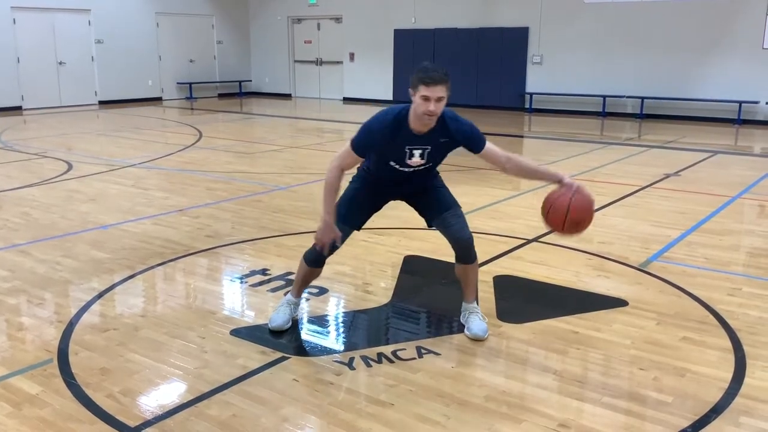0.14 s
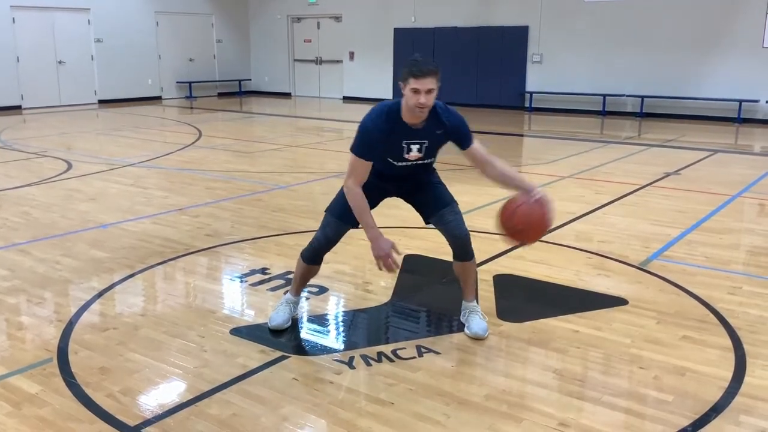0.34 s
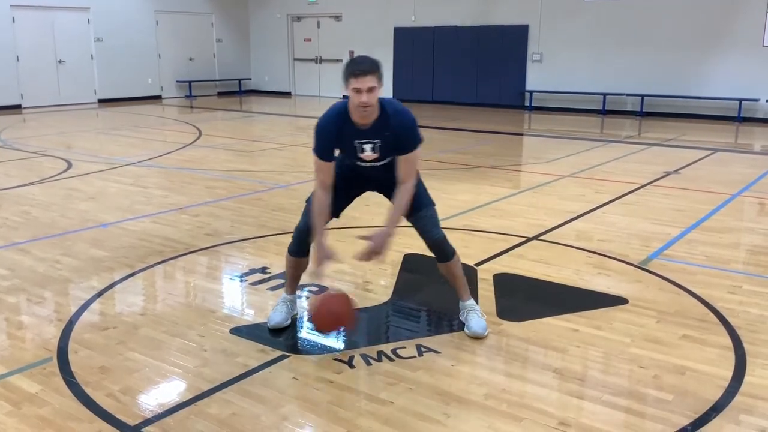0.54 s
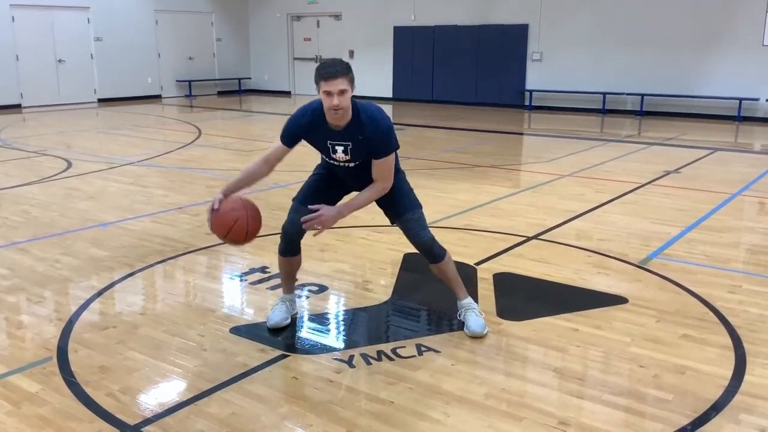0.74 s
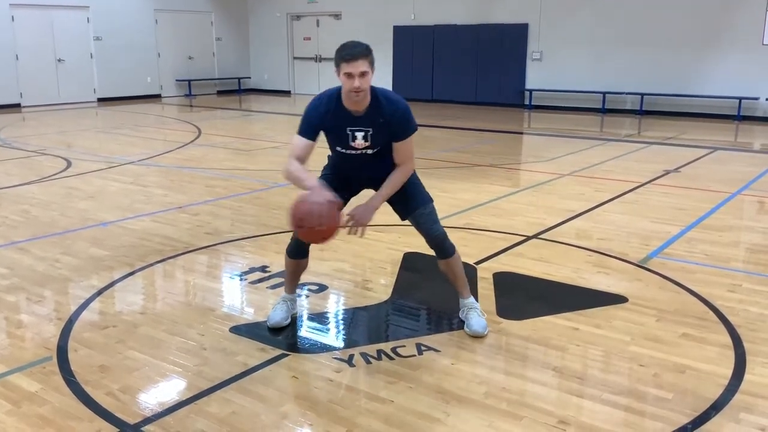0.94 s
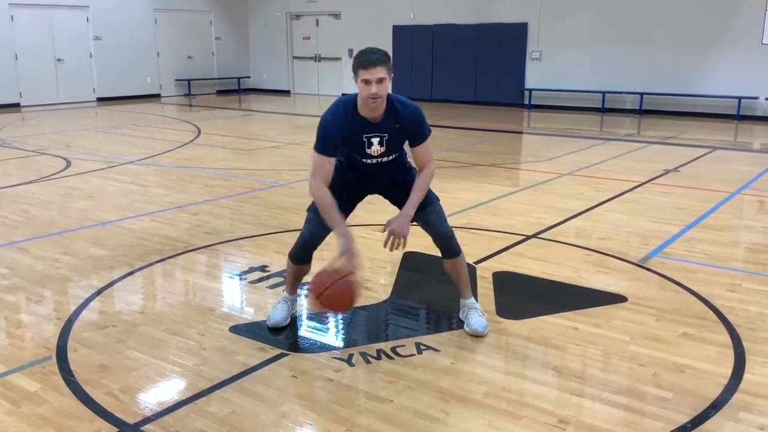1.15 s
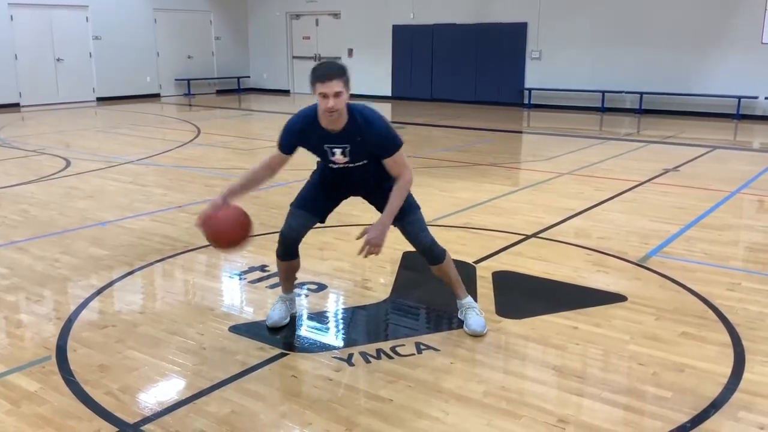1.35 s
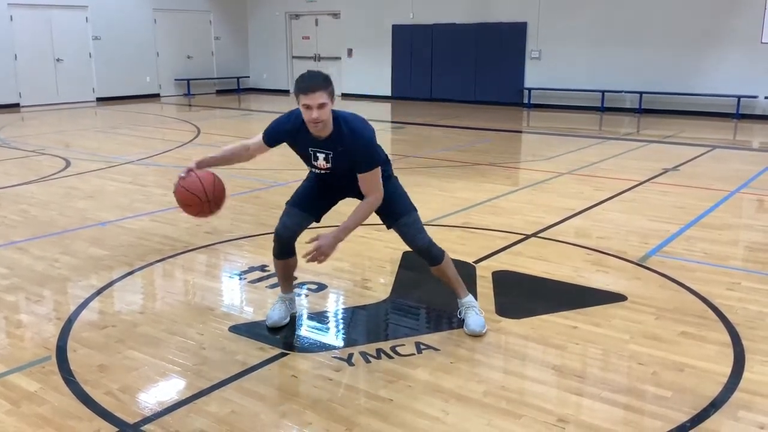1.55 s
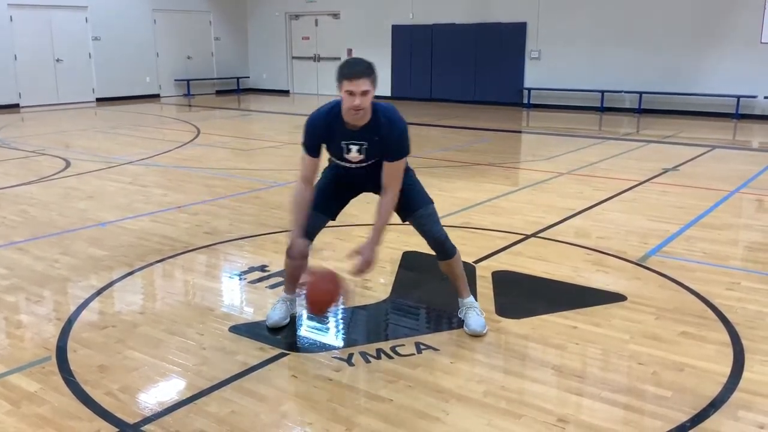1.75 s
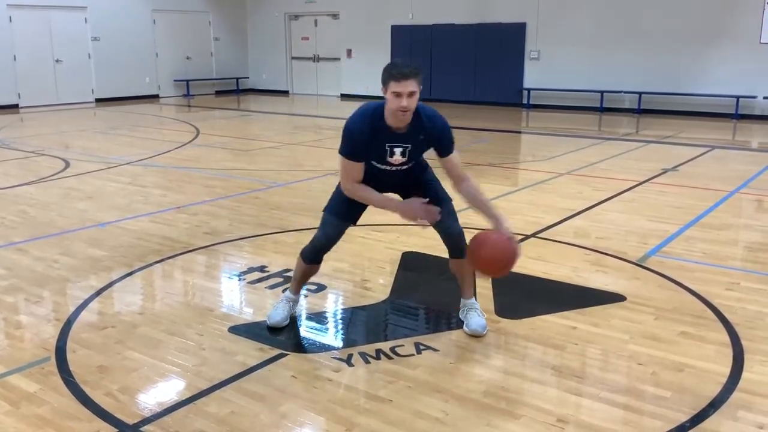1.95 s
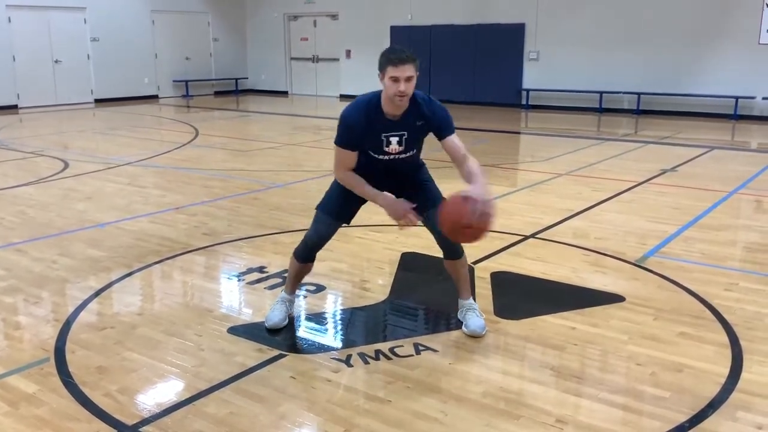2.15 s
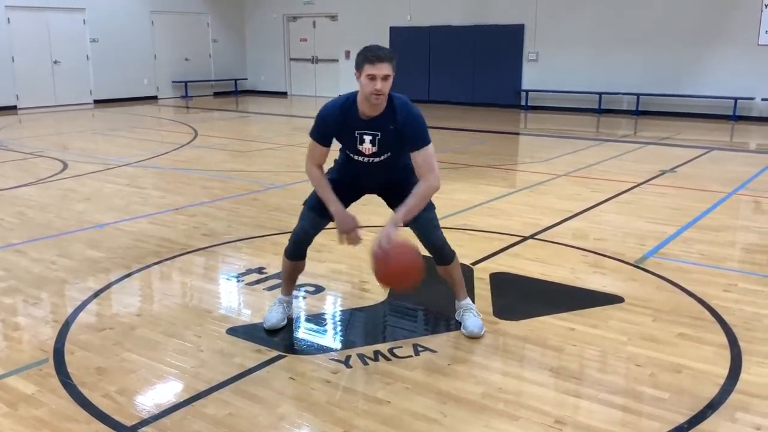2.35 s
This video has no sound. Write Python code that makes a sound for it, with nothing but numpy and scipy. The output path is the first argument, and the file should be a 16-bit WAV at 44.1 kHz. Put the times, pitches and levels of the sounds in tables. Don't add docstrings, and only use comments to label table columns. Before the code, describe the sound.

Loud, steady basketball bounces slap and thump on hardwood, ringing through a large reverberant gymnasium

```python
import sys
import numpy as np
from scipy import signal
from scipy.fft import rfft, irfft
from scipy.io import wavfile

SR = 44100
rng = np.random.default_rng(int(sys.argv[2]) if len(sys.argv) > 2 else 0)


def gain_from_db(level_db):
    decades = np.asarray(level_db, float) / 20
    return 10 ** decades


def dump_mix(stems):
    frames = np.atleast_2d(stems).T
    limited = np.clip(frames, -1, 1)
    pcm = np.round(limited * 32767).astype(np.int16)
    wavfile.write(sys.argv[1], SR, pcm)


N = 110250
PAD = SR
M = N + PAD
BLOCK = 8192
LEFT_RIGHT = np.array([[1], [-1]])


def at_hz(table, hz, column=1):
    t = np.array(table)
    return np.interp(np.log(np.maximum(hz, 1)), np.log(t[:, 0]), t[:, column])


def colour(x, table):
    gain = gain_from_db(at_hz(table, np.fft.rfftfreq(x.shape[-1], 1 / SR)))
    return irfft(rfft(x) * gain / np.sqrt(np.mean(gain ** 2)), x.shape[-1])


def modes(drive, table):
    out = 0
    for hz, db, t60_s in table:
        r = gain_from_db(-60 / (t60_s * SR))
        w = 2 * np.pi * hz / SR
        out = out + gain_from_db(db) * signal.lfilter([0, np.sin(w)], [1, -2 * r * np.cos(w), r * r], drive)
    return out


def shift(x, seconds):
    n = np.arange(len(x))
    return np.interp(n - seconds * SR, n, x, left=0)


def filtered(x, order, hz, kind):
    return signal.sosfilt(signal.butter(order, hz, kind, fs=SR, output="sos"), x)


def ventilation():
    # hz, level_db_per_hz
    air_spectrum = [(25, 9.5), (50, 11.5), (120, -8), (400, -8), (1500, -0.5), (5000, -25.5), (9300, -31),
                    (11000, -51.5)]
    level_db, side_gain = -32.5, 0.15
    mid, side = colour(rng.standard_normal((2, M)), air_spectrum)
    return gain_from_db(level_db) * (mid + side_gain * side * LEFT_RIGHT)


def gym(sent):
    # hz, level_db, t60_s, left_right_likeness [0-1]
    reverb = [(43, -56, 0.37, 0.71), (98, -36.5, 2.12, 1), (141.6, -48.5, 3.48, 1), (270, -41.5, 4.5, 1),
              (450, -33, 4.1, 0.56), (740, -43.5, 3.15, 0.063), (1090, -45.5, 4.6, 0.1),
              (1700, -53, 1.57, 0.66), (2740, -39.5, 2.45, 0.13), (3930, -36.5, 3.13, 0.13),
              (4587, -40.5, 1.6, 0.32), (8000, -42.5, 0.88, 0.28), (10300, -33.5, 0.43, 1),
              (13800, -43, 0.61, 1)]
    start_s, build_s = 0.013, 0.016
    wash_start_s, wash_build_s, wash_db = .071, 0.0045, 3.5
    t = np.arange(2 * SR) / SR
    white = rfft(rng.standard_normal((2, len(t))))
    hz = np.fft.rfftfreq(len(t), 1 / SR)
    early = 1 - np.exp(-np.maximum(t - start_s, 0) / build_s)
    late = 1 - np.exp(-np.maximum(t - wash_start_s, 0) / wash_build_s)
    response = np.zeros((2, len(t)))
    for centre_hz in 25 * 2 ** np.arange(0, 9.7, .5):
        octaves_off = np.abs(np.log2(np.maximum(hz, 1) / centre_hz))
        share = np.clip(1 - 2 * octaves_off, 0, 1)
        mid, side = irfft(white * share, len(t))
        alike = np.clip(at_hz(reverb, centre_hz, column=3), 0, 1)
        fall = gain_from_db(at_hz(reverb, centre_hz) - 60 * t / at_hz(reverb, centre_hz, column=2))
        fall *= early if centre_hz < 3000 else (early + gain_from_db(wash_db) * late) / 2
        response += fall * (np.sqrt(1 + alike) * mid + np.sqrt(1 - alike) * side * LEFT_RIGHT)
    return signal.fftconvolve(response, sent[None], axes=1)[:, :M]


def echoes(clicks, low):
    delays_s = [.0338, .0715, .0785, .110, .150]
    paths = [0, 1, 1, 2, 2]
    # bright_db, low_db, left_over_right_db
    strengths = [(-9.5, -14, 4.5), (-9.5, -13, 9), (-13, -25, -8), (-16, -24.5, 5), (-19, -23, -3)]
    scatter_t60_s, side_gain = 0.005, 0.52
    thin = filtered(clicks, 2, [2610, 16000], "band")
    thin[0] = filtered(thin[0], 3, 10000, "low")
    out = np.zeros((2, M))
    for delay_s, path, (bright_db, low_db, pan_db) in zip(delays_s, paths, strengths):
        d = int(delay_s * SR)
        decay = gain_from_db(-60 * np.arange(1024) / SR / scatter_t60_s)
        mid, side = rng.standard_normal((2, 1024)) * decay
        rough = (mid + side_gain * side * LEFT_RIGHT) / np.linalg.norm(mid)
        back = signal.oaconvolve(thin[path][None], rough, axes=1)[:, :M - d]
        out[:, d:] += gain_from_db(bright_db + pan_db * LEFT_RIGHT / 2) * back + gain_from_db(low_db) * low[:-d]
    return out


def shoe_tick():
    level_db, t60_s = -19.5, 0.0042
    noise = filtered(rng.standard_normal(400), 4, [5000, 9500], "band")
    return gain_from_db(level_db - 60 * np.arange(400) / SR / t60_s) * noise


def skin_slap(t, slap_db, contact_s=.0115):
    # hz, level_db_per_hz
    slap_spectrum = [(650, -16), (1350, 9.5), (2300, -1.5), (2910, -12.5), (3420, -7), (5660, -3.5),
                     (8220, -5), (16000, -15.5)]
    rise_s, t60_s = 0.00049, 0.0041
    rustle_db, peel_db, peel_s = -22, -29, 0.00047
    slap = (1 - np.exp(-t / rise_s)) * gain_from_db(-60 * t / t60_s)
    peel = gain_from_db(peel_db) * np.exp(-((t - 1.11 * contact_s) / peel_s) ** 2)
    rustle = gain_from_db(rustle_db) * np.clip((contact_s - t) / 0.003 + 1, 0, 1)
    shape = gain_from_db(slap_db + 5.0) * (slap + peel + rustle)
    mid, side = colour(rng.standard_normal((2, len(t))), slap_spectrum)
    skin = shape * (mid + 0.6 * side * LEFT_RIGHT)
    impulse = 1. * (np.arange(len(t)) == 24)
    return skin, np.linalg.norm(shape) * colour(impulse, slap_spectrum)


def air_ring(t, lift_db, strike_db):
    # hz, t60_s
    air_modes = [(900, 0.014), (1040, 0.083), (1400, 0.02), (1750, 0.015), (2200, 0.0066), (2760, 0.015),
                 (4750, 0.0073)]
    strike_hz = [950, 1400, 2000, 2800, 4750]
    lift_s, longest_t60_s = .011, .022
    touch = np.exp(-((t - .0005) / .00005) ** 2 / 2)
    lift = gain_from_db(lift_db) * np.exp(-((t - lift_s) / .00011) ** 2 / 2)
    knock = filtered((touch + lift) / 5.5, 4, 780, "high")
    table = [(hz, np.interp(hz, strike_hz, strike_db), min(t60_s, longest_t60_s))
             for hz, t60_s in air_modes]
    return modes(knock, table)


def floor_wave(t, crest_s):
    wave_s, wave_hz = .0126, 154
    width_s, tail_db, tail_t60_s = 0.0049, -7, 0.18
    u = t / crest_s
    crest = np.exp(-((t - crest_s) / width_s) ** 2)
    tail = (u > 1) * gain_from_db(tail_db - 60 * (t - crest_s) / tail_t60_s) * (1 - np.exp(1 - u))
    return -(crest + tail) * np.cos(2 * np.pi * wave_hz * wave_s * np.log(t / wave_s))


def board_knock(t):
    # hz, level_db, t60_s
    board_modes = [(263, 1.5, 0.027), (400, -5.5, 0.09), (233, 0.5, 0.043)]
    pushes_s = [.0053, .0089]
    push = sum(np.exp(-((t - s) / 0.00041) ** 2) for s in pushes_s)
    return -modes(push / push.sum(), board_modes)


def bounce(slap_db, thump_db, board_db, crest_s, lift_db, strike_db):
    t = np.arange(1, BLOCK + 1) / SR
    skin, click = skin_slap(t, slap_db)
    air = air_ring(t, lift_db, strike_db)
    wave = gain_from_db(thump_db) * floor_wave(t, crest_s)
    return skin, click, air, wave, gain_from_db(board_db + 6) * board_knock(t)


def ball():
    landings_s = [
        -0.66,
        -0.0355,
        0.5722,
        1.2438,
        1.8452,
        2.4798,
    ]
    # slap_db, thump_db, board_db, floor_wave_crest_s, lift_off_ring_db
    bounces = [(6, 1.5, -13.5, 0.01, -14), (-7, 0, -13, .012, -14.5), (-2.5, -1.5, -4.5, 0.0111, -13.5),
               (-3, -1.5, -19, 0.011, -10), (-5, -1, -9.5, 0.011, -24.5), (-3, 1, -19, 0.011, 1)]
    # db at 950 Hz, 1400 Hz, 2000 Hz, 2800 Hz, 4750 Hz
    strikes = [(-26, -10, -5, -26, -9), (-16, -10, -9.5, -7.5, -5), (-12, -16, -9, -9.5, -7),
               (-11, 2, -47.5, -14.5, 0), (-16.5, 4, -36, -16.5, -0.5), (-13.5, -29, -47.5, -7.5, -16)]
    # thump_db, boards_db, ring_db, skin_db
    sends = [(3.5, -1.5, 5, 11), (0, 0.5, 3, 3), (3.5, -1.5, 0.5, 2), (3.5, 8, 1.5, -0.5),
             (1.5, 5, -0.5, -3), (0, 0, -7, 10)]
    # ceiling_db, near_wall_db, far_walls_db
    returns = [(0, 0, 0), (4, 0, -0.5), (-3, 0, 1), (-1.5, -3.5, -5), (-4, -5, -7), (0, 0, 0)]
    tick_s, board_foot_hz = 1.1415, 61
    bright, clicks = np.zeros((2, M + BLOCK)), np.zeros((3, M + BLOCK))
    low, sent = np.zeros(M + BLOCK), np.zeros(M + BLOCK)
    for start_s, levels, strike_db, sent_db, return_db in zip(landings_s, bounces, strikes, sends, returns):
        skin, click, air, wave, boards = bounce(*levels, strike_db)
        i = int(start_s * SR) + PAD
        here = slice(i, i + BLOCK)
        bright[:, here] += skin + air
        low[here] += wave + boards
        clicks[:, here] += gain_from_db(return_db)[:, None] * (click + air)
        sent[here] += gain_from_db(sent_db) @ np.array([wave, boards, air, click])
    i = int(tick_s * SR) + PAD
    bright[:, i:i + 400] += shoe_tick()
    low = filtered(low[:M], 2, board_foot_hz, "high")
    sent = filtered(sent[:M], 2, board_foot_hz, "high")
    return bright[:, :M], low, clicks[:, :M], sent


def spaced_pair(x):
    split_hz, low_lead_s, high_lag_samples = 550, 0.00055, 35
    bright_db = 0
    low = signal.sosfiltfilt(signal.butter(2, split_hz, fs=SR, output="sos"), x[0])
    top = signal.sosfiltfilt(signal.butter(1, 5000, "high", fs=SR, output="sos"), x[0])
    high = x[0] - low + (gain_from_db(bright_db) - 1) * top
    left = shift(low, -low_lead_s) - shift(high, high_lag_samples / SR)
    return np.array([left, x[1]])


def scene():
    bright, low, clicks, sent = ball()
    mix = bright + low + echoes(clicks, low) + gym(sent) + ventilation()
    return spaced_pair(mix)[:, PAD:]


def roll_off(x):
    return signal.sosfilt(signal.butter(12, 16480, fs=SR, output="sos"), x)


def record(dry):
    out_db = 0.16
    mix = np.clip(gain_from_db(out_db) * dry, -1, 1)
    return roll_off(mix)


dry = scene()
out = record(dry)
dump_mix(out)
```